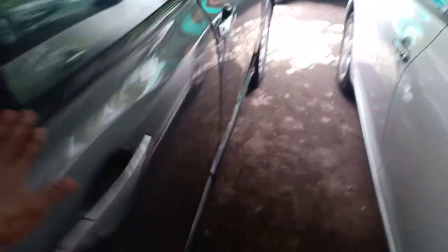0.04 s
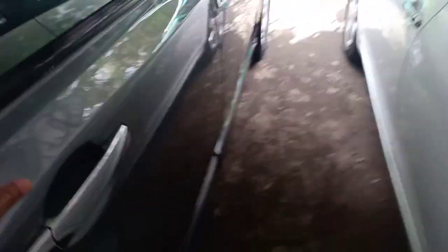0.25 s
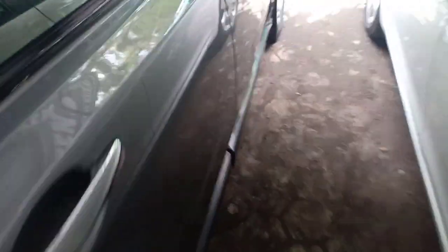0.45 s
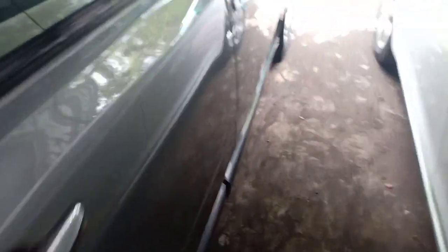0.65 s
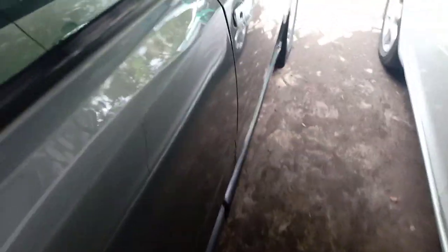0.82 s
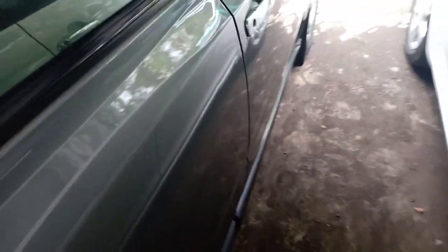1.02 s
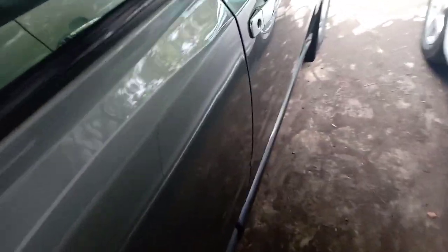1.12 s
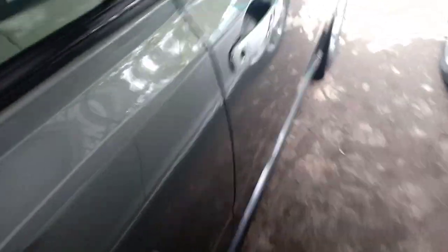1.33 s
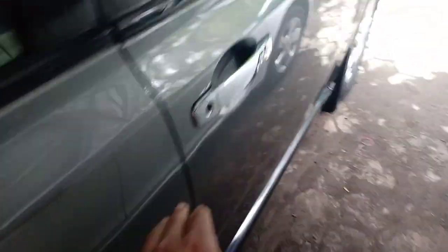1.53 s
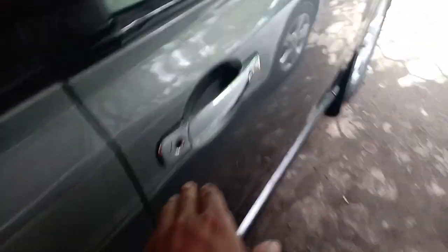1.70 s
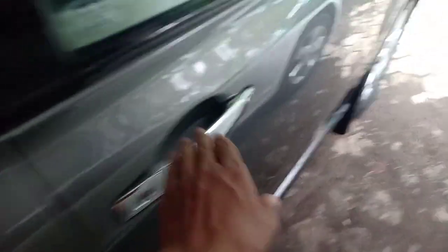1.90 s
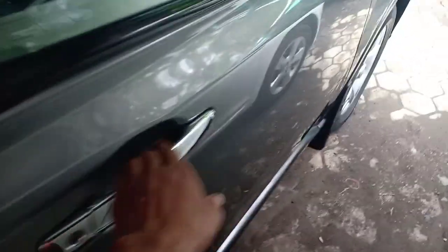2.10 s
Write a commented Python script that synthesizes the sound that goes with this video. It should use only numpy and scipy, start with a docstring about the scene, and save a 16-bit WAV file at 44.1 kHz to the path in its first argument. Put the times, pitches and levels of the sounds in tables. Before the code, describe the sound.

A car door closes at arm's length: a faint knock at 0.06 seconds, then a loud latch clatter and heavy, booming thump from 0.2 to 0.3, with short reflections from nearby cars. Near quiet follows, with tiny ticks around 0.75 to 0.95, a soft gritty scuff at 1.2, a small tick at 1.67, and a bright jerky rasp at 1.9 to 2.0. A faint hollow tone ends it over low rumble, hiss and hum.

```python
"""A car door is pushed shut between two parked cars, an arm's length from a hand-held phone with two microphones.
Cloth and soles slide softly (swelling noise); the latch clatters over the striker (noise bursts, ringing modes),
then the door seats on its seals and the panels boom (damped modes, short low swells, thuds of noise).
Shoes scuff the gritty ground (grainy noise), and a bright rasp of jerking modes comes as the hand nears
the handle; a hollow tone swells at the end. Room reflections follow; rumble, hiss and a hum lie under it all."""
import sys
import numpy as np
from scipy import signal
from scipy.fft import rfft, irfft
from scipy.io import wavfile
from scipy.ndimage import uniform_filter1d

SR = 44100
rng = np.random.default_rng(int(sys.argv[2]) if len(sys.argv) > 2 else 0)


def wrap_up_sound(samples):
    """Save the sound to the file named by the first command line argument, as 16-bit audio."""
    columns = np.atleast_2d(samples).T
    # keep every value between -1 and 1, then stretch to whole-number steps
    tamed = np.clip(columns, -1, 1)
    steps = np.round(tamed * 32767).astype(np.int16)
    wavfile.write(sys.argv[1], SR, steps)


N = 94815
T = np.arange(N) / SR  # seconds
FREQS = np.arange(N + 1) * SR / (2 * N)  # Hz, for spectra of twice the length


def amp(db):
    """Decibels to gain."""
    return 10 ** (np.asarray(db) / 20)


def walk(hz):
    """Smooth chance with a spread near 1, drawn afresh about hz times a second."""
    step = max(int(SR / hz), 1)
    held = np.repeat(rng.standard_normal(N // step + 1), step)
    return 1.2 * uniform_filter1d(held, step)[:N]


def fade(start, t60):
    """Sudden start and exponential decay, falling 60 dB in t60 seconds."""
    age = np.maximum(T - start, 0)
    return (T >= start) * np.exp(-np.log(1000) * age / max(t60, 1e-3))


def highpass(x, hz, order=2):
    """Takes away what lies below hz."""
    return signal.sosfilt(signal.butter(order, hz, "high", fs=SR, output="sos"), x)


def colour(x, points, tilt_db=0):
    """Causal filter through (Hz, dB) points, tilted in dB per octave; keeps the power of white noise."""
    hz, db = np.array(points).T
    octave = np.log2(np.maximum(FREQS, 10))
    gain = amp(np.interp(octave, np.log2(hz), db) + tilt_db * octave)
    # folding the cepstrum onto positive time gives minimum phase
    cepstrum = irfft(np.log(gain / np.sqrt(np.mean(gain ** 2))))
    cepstrum[1:N] *= 2
    cepstrum[N + 1:] = 0
    response = np.exp(rfft(cepstrum))
    return irfft(rfft(x, 2 * N) * response)[..., :N]


def place(x, lag_ms, pan_db=0):
    """A sound reaches the left microphone later than the right; positive pan is louder at the left."""
    delay = np.exp(-2j * np.pi * FREQS * lag_ms / 1000)
    left = irfft(rfft(x, 2 * N) * delay)[:N]
    return np.array([left * amp(pan_db / 2), x * amp(-pan_db / 2)])


DIFFUSE_HZ = 600  # about here the two microphones begin to differ


def noise(spread, lag_ms=0, pan_db=0):
    """Noise at two microphones: alike in the bass, partly unrelated above."""
    apart = np.clip(spread, 0, 1) * FREQS ** 2 / (FREQS ** 2 + DIFFUSE_HZ ** 2)
    shared = place(rng.standard_normal(N), lag_ms, pan_db)
    own = rng.standard_normal((2, N))
    spectrum = rfft(shared, 2 * N) * np.sqrt(1 - apart) + rfft(own, 2 * N) * np.sqrt(apart)
    return irfft(spectrum)[:, :N]


RING_RISE_CYCLES = 0.24  # time constant of each mode's swell


def ring(start, modes):
    """Damped modes set off at one moment, each swelling within its first cycle."""
    age = np.maximum(T - start, 0)
    total = 0
    for hz, db, t60 in modes:
        swell = -np.expm1(-age * hz / RING_RISE_CYCLES)
        total = total + amp(db) * fade(start, t60) * swell * np.sin(2 * np.pi * hz * age)
    return total


def bursts(rows, points, source):
    """Each contact is a sudden burst of noise that dies away, coloured and tilted."""
    return sum(colour(source * amp(db) * fade(start, t60), points, tilt)
               for start, db, t60, tilt in rows)


def door():
    """The latch clashes, the panels ring, the cabin booms and the seals thud."""
    return latch_claw() + latch_clash() + door_body() + seals()


# The latch claw striking its bar. Each row: start in seconds, level in dB.
STRIKES = [(0.2054, -11.5), (0.2132, -19.5), (0.2272, -20.5), (0.2402, -21.5)]
# Modes of the claw. Each row: frequency in Hz, level in dB, t60 in seconds.
LATCH_MODES = [(1823, -10, 0.26), (2004, -15, 0.12), (2224, -18, 0.11), (2370, -10.5, 0.029),
               (2397, -6, 0.058), (2483, -2.5, 0.057), (2657, -7, 0.034), (2800, -17, .035)]
DOOR_LAG_MS, DOOR_SPREAD = 0.412, 0.51  # latch delay at the left; spread from 0 (alike) to 1


def latch_claw():
    """Each strike sets off the same damped metal modes."""
    claw = sum(amp(db) * ring(start, LATCH_MODES) for start, db in STRIKES)
    return place(highpass(claw, 1750), DOOR_LAG_MS)


# Latch and door metal clashing. Each row: start in seconds, level in dB, t60 in seconds,
# tilt in dB per octave.
CLACKS = [(.2048, -17, 0.08, 0), (.2245, -12.5, 0.038, -4), (.2275, -13, .085, -1),
          (.2415, -20, 0.093, 2.5), (.2515, -24, 0.096, -2.5), (.2652, -18, 0.066, 4.5),
          (.3025, -31.5, 0.068, 6)]
# Colour of that clash. Each row: frequency in Hz, relative level in dB.
CLACK_COLOUR = [(60, -44), (200, -18), (330, 0), (520, 1.5), (900, 0.5), (1350, -2.5), (1850, -3),
                (2600, -5), (3000, -14), (3450, -17), (3900, -13.5), (4350, -20.5), (5000, -14.5),
                (6500, -23.5), (9000, -45.5), (14000, -51)]


def latch_clash():
    """Clashing metal has modes too dense to tell apart, heard as fading noise."""
    return bursts(CLACKS, CLACK_COLOUR, noise(DOOR_SPREAD, DOOR_LAG_MS, pan_db=-0.5))


# Blows to the door's body. Each row: start in seconds, level in dB, centre of the push in Hz,
# half-width in octaves to the 3 dB point.
BLOWS = [(0.0582, -29, 310, 0.33), (.068, -30, 533, 0.24), (.2055, -8, 515, 0.097),
         (0.2118, -13, 574, 0.12), (.2268, -19.5, 780, 0.32), (.2345, -11, 351, 0.33),
         (0.2651, -9, 226, 0.86)]
# Door panel and cabin modes. Each row: frequency in Hz, level in dB, t60 in seconds.
DOOR_MODES = [(62, -5.5, 0.35), (106, -17, 0.059), (128.8, -7, 0.22), (183.6, -6, .17), (204.7, -5.5, 0.12),
              (240, -8, 0.14), (306, -13.5, .12), (388.2, -6.5, 0.12), (418, -11, 0.09), (467, -7, 0.056),
              (520, -13, 0.16), (541, -4, 0.066), (593, -11, 0.074), (789, -8.5, 0.13), (862, -7.5, 0.13),
              (895, -3, 0.14)]
BODY_LAG_MS, DOOR_PAN_DB = 0.24, -3  # nearer and louder at the right microphone


def door_body():
    """Each blow rings the modes near its own centre, while the cabin air booms."""
    body = sum(boom(*row) for row in BOOMS)
    for start, level, centre, width in BLOWS:
        pushed = []
        for hz, db, t60 in DOOR_MODES:
            off_centre_db = 10 * np.log10(1 + (np.log2(hz / centre) / width) ** 4)
            pushed.append((hz, level + db - off_centre_db, t60))
        body = body - ring(start, pushed)
    return place(body, BODY_LAG_MS, DOOR_PAN_DB)


# Cabin air squeezed by the door and its rebounds. Each row: start in seconds, level in dB,
# frequency in Hz, length in seconds.
BOOMS = [(.080, -37.5, 129, 0.02), (.2305, -19.5, 194.4, 0.029), (.2652, -8.5, 119.5, 0.017),
         (.2955, -22, 134.6, 0.023), (.351, -32, 124, .026), (0.402, -37.5, 91.5, 0.034)]


def boom(start, db, hz, length):
    """A short swell of low pressure, damped at once by the seals."""
    swell = np.sin(np.pi * np.clip((T - start) / length, 0, 1))
    return -amp(db) * swell * np.sin(2 * np.pi * hz * (T - start))


# The seals and trim thudding. Each row: start in seconds, level in dB, t60 in seconds,
# tilt in dB per octave.
THUDS = [(.0575, -33, 0.078, 2), (.215, -31, 0.26, -1), (.228, -23.5, 0.29, 3), (.2652, -24, 0.15, -1)]
# Colour of the thuds. Each row: frequency in Hz, relative level in dB.
THUD_COLOUR = [(20, -15), (50, 6), (120, -1), (250, 4), (450, -5.5), (700, -15.5), (1200, -12),
               (3000, -67.5), (14000, -58)]


def seals():
    """Soft seals and trim give dull, fading bursts of noise."""
    return bursts(THUDS, THUD_COLOUR, noise(DOOR_SPREAD, BODY_LAG_MS, DOOR_PAN_DB))


GRIT_DB, GRIT_HZ = 2, 339  # spread and rate of the grain in level
RASP_LAG_MS, RASP_SPREAD = 0.091, 0.57
# Gritty scrapes and ticks. Each row: start in seconds, level in dB, t60 in seconds,
# tilt in dB per octave.
SCRAPES = [(.057, -38.5, 0.097, 2), (.746, -47, 0.028, 1), (.7735, -55, 0.023, 16), (.79, -58, .02, 11),
           (.8995, -56, .03, 7), (.947, -55, .02, 2), (1.2062, -35, 0.22, 1), (1.2555, -43, 0.065, -8.5),
           (1.2755, -43.5, .1, -2), (1.322, -47.5, 0.31, -7.5), (1.6712, -36, .015, 2.5),
           (1.893, -35, 0.42, 0.5), (1.9015, -34.5, 0.18, 2), (1.9068, -22.5, 0.076, -3),
           (1.9408, -27, 0.12, -1), (1.9455, -22.5, 0.1, -0.5), (1.9595, -23.5, 0.14, -1),
           (1.976, -30.5, 0.25, 0.5), (1.993, -30, 0.11, 1), (2.0105, -38, 0.065, 1),
           (2.023, -40, 0.075, 4.5)]
# Colour of the scrapes. Each row: frequency in Hz, relative level in dB.
SCRAPE_COLOUR = [(100, -44), (280, -30.5), (450, -19.5), (750, -14.5), (1500, -16), (2000, -5.5),
                 (2450, -1), (3000, -8.5), (3500, -11), (4400, -10.5), (5200, -6), (6200, -9.5),
                 (7500, -21.5), (9500, -32.5), (12000, -35.5), (13700, -26.5), (16000, -48)]


def scrapes():
    """Friction over grit: bursts of noise whose level flickers grain by grain."""
    grit = noise(RASP_SPREAD, RASP_LAG_MS) * amp(GRIT_DB * walk(GRIT_HZ))
    return bursts(SCRAPES, SCRAPE_COLOUR, grit)


# Stick-slip jerks within the loud rasp. Each row: start in seconds, level in dB.
JERKS = [(1.9098, -35.5), (1.9456, -12.5), (1.953, -15), (1.9599, -10.5), (1.97, -13), (1.975, -10),
         (2.0117, -22), (2.024, -31)]
# What the jerks ring. Each row: frequency in Hz, level in dB, t60 in seconds.
RASP_MODES = [(2160, -8.5, .022), (2530, -7.5, 0.027), (2430, -9, .022), (2540, -6, 0.025),
              (2740, -6.5, 0.029), (3000, -26, .012)]


def rasp_jerks():
    """The rasp sticks and slips in ringing jerks, each at a slightly different pitch."""
    pitch = 1 + 0.032 * rng.uniform(-1.9, 1.9, len(JERKS))
    jerks = 0
    for (start, level), ratio in zip(JERKS, pitch):
        modes = [(hz * ratio, db, t60) for hz, db, t60 in RASP_MODES]
        jerks = jerks + amp(level) * ring(start, modes)
    return place(highpass(jerks, 1800), RASP_LAG_MS)


# Soft sliding of sleeve and soles. Each row: start in seconds, rise in seconds, hold in seconds,
# release t60 in seconds, level in dB.
SLIDES = [(0, 0.0033, 0.087, 0.28, -51.5), (0.091, 0.026, 0.17, 0.31, -45.5),
          (0.325, .04, 0.062, 0.28, -51.5), (0.509, 0.0091, 0.026, 1, -56.5),
          (0.892, .02, 0.055, 0.12, -55.5), (1.229, 0.032, 0.028, 0.46, -41),
          (1.362, 0.018, 0.094, 0.41, -46.5), (1.636, 0.027, 0.01, 0.33, -54.5),
          (2.034, 0.025, 0.033, 0.56, -48)]
# Colour of the sliding. Each row: frequency in Hz, relative level in dB.
SLIDE_COLOUR = [(100, -29.5), (450, -12.5), (1000, -16.5), (1600, -15), (2100, -1.5), (2650, 0),
                (3500, -9.5), (4400, -5), (5300, -1), (6300, -3.5), (7500, -14), (9500, -27),
                (12000, -26.5), (13600, -21.5), (16000, -37)]


def slides():
    """Soft grainy friction that swells, holds and dies away, louder at the left."""
    effort = 0
    for start, rise, hold, t60, db in SLIDES:
        release = start + rise + hold
        swell = np.clip((T - start) / rise, 0, 1)
        effort = effort + amp(db) * swell * ((T < release) + fade(release, t60))
    grit = noise(spread=0.89, pan_db=7) * amp(GRIT_DB * walk(GRIT_HZ))
    return colour(grit * effort, SLIDE_COLOUR)


TONE_S, TONE_RISE_S, TONE_DB = 2.055, 0.085, -55
# Colour of the hollow tone. Each row: frequency in Hz, relative level in dB.
TONE_COLOUR = [(400, -35), (680, -12), (755, -2), (830, -14), (1400, -44.5)]


def hollow_tone():
    """A narrow band of noise that swells faintly and holds to the end."""
    swell = np.clip((T - TONE_S) / TONE_RISE_S, 0, 1)
    return colour(noise(spread=0.87), TONE_COLOUR) * swell * amp(TONE_DB)


ROOM_T60_S, ROOM_DAMP_S_PER_KHZ = 0.4, 0.016  # decay in the bass, and its shortening with pitch
ROOM_DB, ROOM_ONSET_S = -12, 0.011


def room(x):
    """Reflections from cars and walls build up and fade, the treble a little sooner."""
    spectrum = rfft(noise(1), 2 * N)
    tail = 0
    edges = [0, 700, 2000, 4000, 8000, 16000]  # Hz
    for low, high in zip(edges, edges[1:]):
        t60 = ROOM_T60_S - ROOM_DAMP_S_PER_KHZ * low / 1000
        band = irfft(spectrum * ((FREQS >= low) & (FREQS < high)))[:, :N]
        tail = tail + band * fade(0, t60)
    tail = tail * np.clip(T / ROOM_ONSET_S, 0, 1) ** 2
    tail = tail / np.sqrt(np.sum(tail ** 2) / 2)  # unit energy per microphone on average
    return signal.fftconvolve(x, tail, axes=1)[:, :N] * amp(ROOM_DB)


# Distant rumble and hiss. Each row: frequency in Hz, relative level in dB.
AMBIENCE = [(25, -24), (55, -6.5), (96, -4.5), (183, -9), (280, -13.5), (430, -15), (760, -18.5),
            (1000, -18), (1350, -22.5), (2170, -16.5), (2800, -20.5), (4000, -29.5), (6050, -24.5),
            (7400, -39), (9500, -42), (12800, -42), (13500, -30.5), (14200, -42), (15500, -49)]
AMBIENCE_DB = -53


def distant_air():
    """Wide coloured noise whose level drifts very slightly."""
    return colour(noise(spread=1.0, pan_db=-3), AMBIENCE) * amp(AMBIENCE_DB + 0.16 * walk(3.8))


HUM_HZ, HUM_DB = 97, -59  # centres, about which pitch and level waver


def hum():
    """A low sine wavering in pitch and level, the same at both microphones."""
    hz = HUM_HZ * (1 + 0.047 * walk(25.33))
    return np.sin(2 * np.pi * np.cumsum(hz) / SR) * amp(HUM_DB + 2 * walk(40))


def scene():
    """Door and handling in their space, which returns little bass, over the ambience."""
    near = door() + scrapes() + rasp_jerks() + slides()
    reflections = room(highpass(near, 237))
    return near + reflections + hollow_tone() + distant_air() + hum()


MIC_LOW_HZ, TOP_HZ = 41.7, 15400


def record(dry):
    """The phone drops the deep bass, clips the peaks under full scale and cuts the top."""
    held = np.clip(highpass(dry, MIC_LOW_HZ, order=4), -.9, .9)
    return signal.sosfilt(signal.ellip(8, .2, 80, TOP_HZ, fs=SR, output="sos"), held)


dry = scene()
out = record(dry)
wrap_up_sound(out)
```